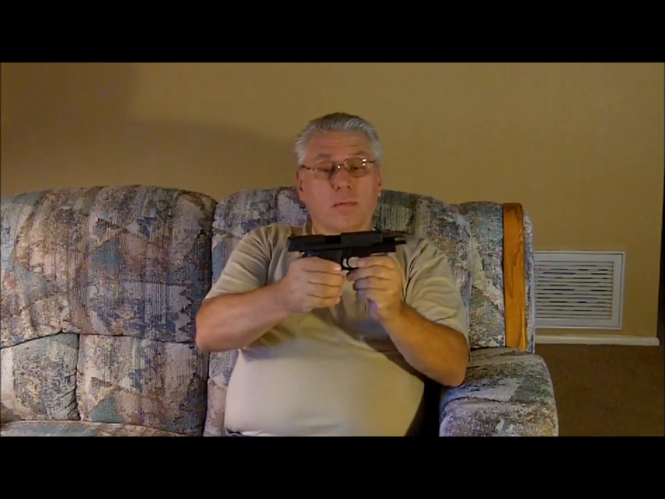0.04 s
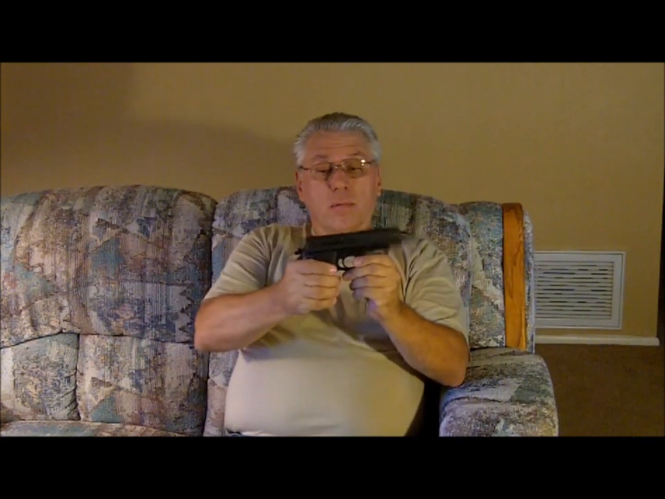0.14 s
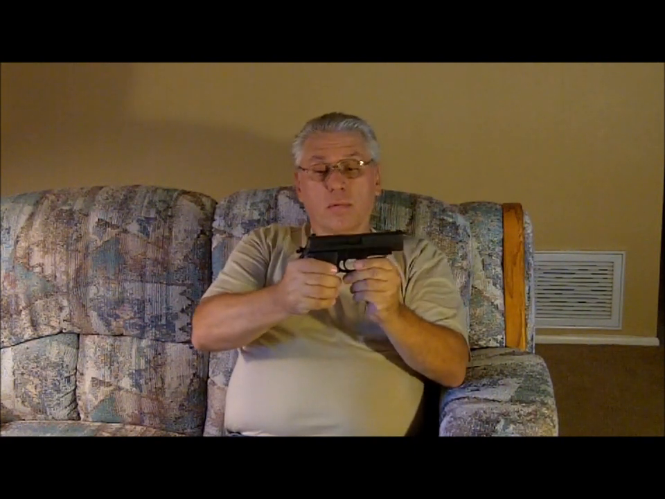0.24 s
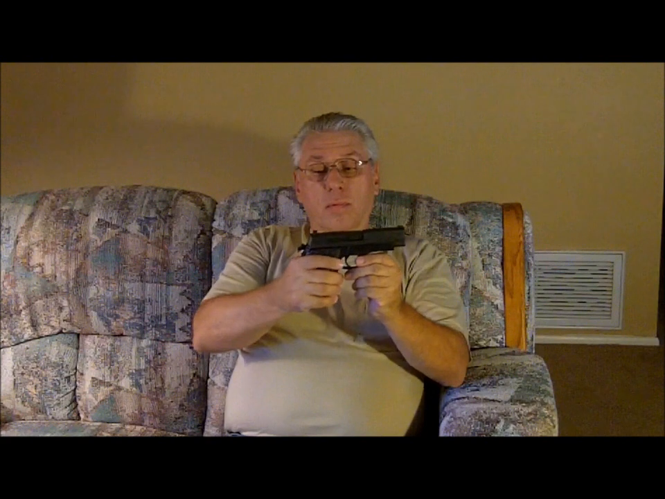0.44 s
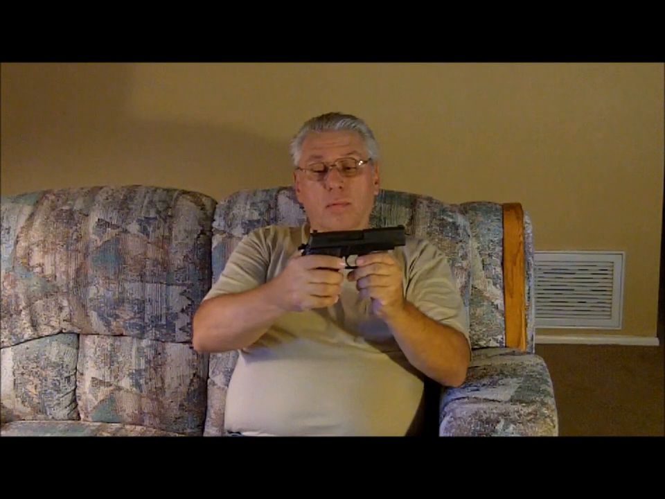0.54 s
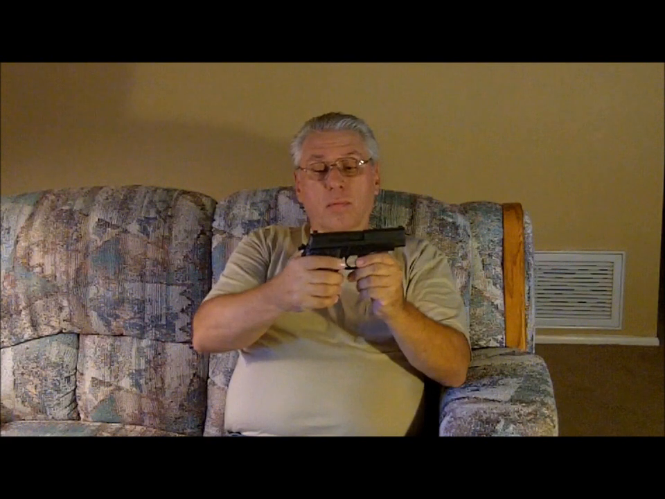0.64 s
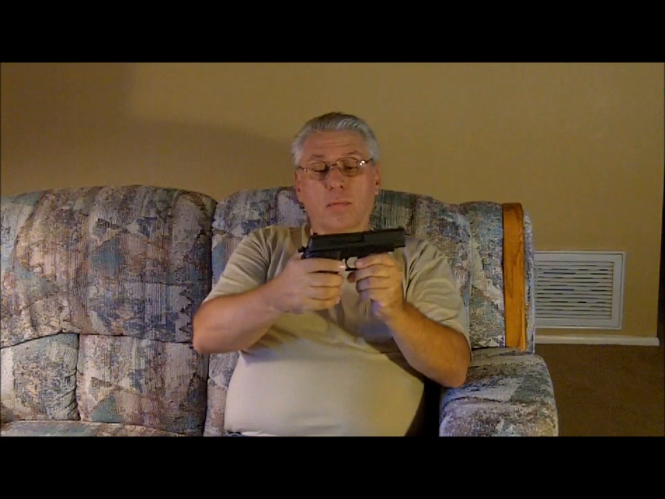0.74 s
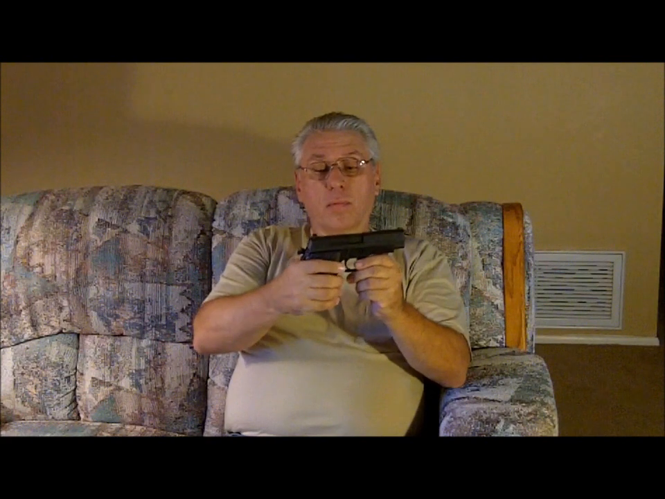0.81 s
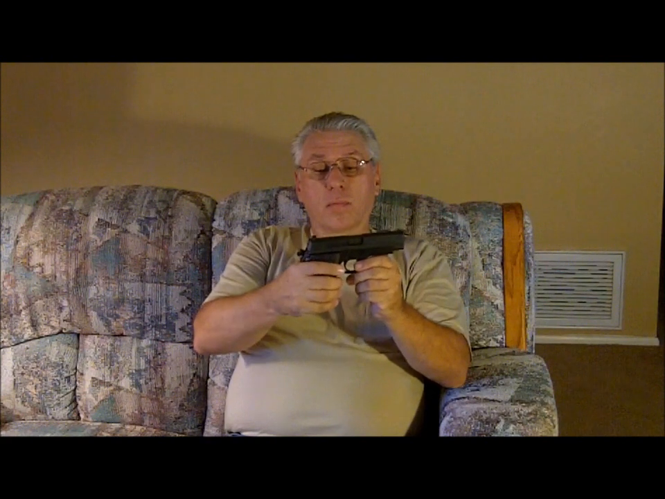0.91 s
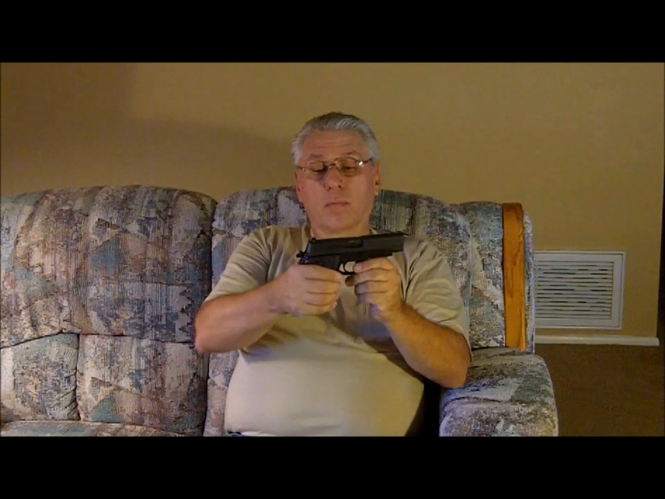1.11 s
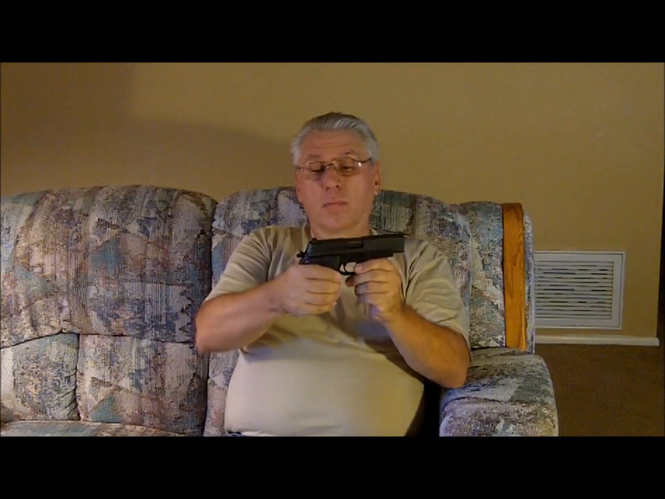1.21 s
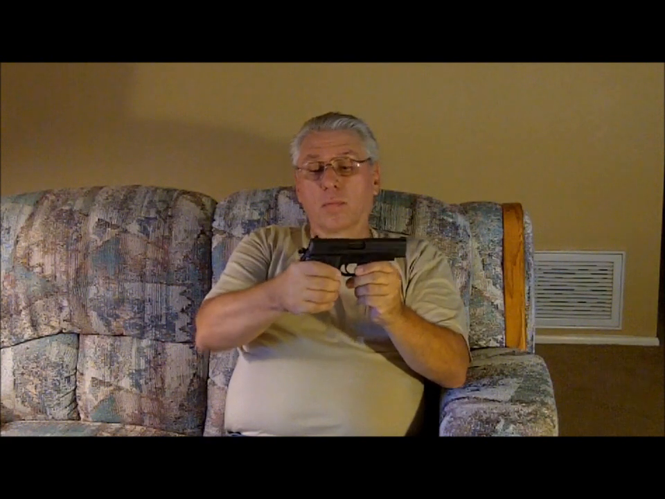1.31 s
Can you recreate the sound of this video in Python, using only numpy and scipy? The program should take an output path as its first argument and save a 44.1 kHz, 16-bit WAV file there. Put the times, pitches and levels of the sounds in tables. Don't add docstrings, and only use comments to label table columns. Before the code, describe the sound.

A pistol's steel slide snaps forward and slams shut in a living room, ringing briefly

```python
import sys
import numpy as np
from scipy import signal
from scipy.fft import rfft, irfft, next_fast_len
from scipy.io import wavfile
from scipy.ndimage import uniform_filter1d, map_coordinates

SR = 44100
rng = np.random.default_rng(int(sys.argv[2]) if len(sys.argv) > 2 else 0)


def to_wav(s):
    ch = np.atleast_2d(s).T
    pcm = np.round(np.clip(ch, -1, 1) * 32767)
    wavfile.write(sys.argv[1], SR, pcm.astype(np.int16))


def nominal_scale(level):
    x = np.asarray(level, float) / 20
    return 10 ** x


N = 59535
TIME = np.arange(N) / SR

# frequency in Hz, left-right likeness (1 is mono).
LIKENESS = [(60, 0.57), (240, 0.6), (940, 0.66), (3710, 0.61), (14700, 1)]
# frequency in Hz, level in dB per Hz.
TICK_COLOUR = [(240, -43), (400, -13.5), (702, -5.5), (2160, -10), (2760, -18), (4910, -7.5), (15100, -28)]
# frequency in Hz, level in dB per Hz.
STEEL_COLOUR = [(120, -42), (200, -9), (1000, -17), (2220, -2.5), (3560, -7), (4190, -0.5), (9620, -10.5),
                (15100, -15)]


def unit(x):
    return x / np.sqrt(np.mean(x ** 2) + 1e-20)


def along(points, hz):
    f, value = np.transpose(points)
    return np.interp(np.log(hz + 1), np.log(f + 1), value)


def closed(points, hz):
    inside = (hz >= points[0][0] / 2) * (hz <= points[-1][0] * 2)
    return nominal_scale(along(points, hz)) * inside


def filtered(x, response):
    n = x.shape[-1]
    m = next_fast_len(n + SR)
    hz = np.fft.rfftfreq(m, 1 / SR)
    return irfft(rfft(x, m) * response(hz), m)[..., :n]


def coloured(n, colour):
    return unit(filtered(rng.standard_normal(n), lambda hz: closed(colour, hz)))


def wobble(rate):
    knots = rng.standard_normal(int(N * rate / SR) + 4)
    return map_coordinates(knots, [np.arange(N) * rate / SR])


def rush(colour, likeness):
    def response(hz):
        turn = np.arccos(np.clip(along(likeness, hz), -1, 1)) / 2
        return closed(colour, hz) * [np.cos(turn), np.sin(turn)]

    mid, side = filtered(rng.standard_normal((2, N)), response)
    return unit(np.array([mid + side, mid - side]))


def swell(start_s, rise_s):
    return np.clip((TIME - start_s) / rise_s, 0, 1)


def struck(contacts, modes, colour):
    mode_scatter_db, phase_scatter_rad = 2, 0.6
    crack_t60_s, strike_s = .012, 0.00022
    out = np.zeros(N + SR)
    t = np.arange(SR // 4) / SR
    hz, level, t60 = np.transpose(modes)[:, :, None]
    for start_s, db, crack_db in contacts:
        scatter, phase = rng.standard_normal((2, len(modes), 1))
        decay = nominal_scale(level + mode_scatter_db * scatter - 60 * t / t60)
        ring = np.sum(decay * np.sin(2 * np.pi * hz * t + phase_scatter_rad * phase), axis=0)
        ring = ring / np.sqrt(np.sum(nominal_scale(level) ** 2))
        crack = coloured(len(t), colour) * nominal_scale(crack_db - 60 * t / crack_t60_s)
        onset = 1 - np.exp(-t / strike_s)
        out[round(start_s * SR):][:len(t)] += nominal_scale(db) * (ring + crack / 2) * onset
    return out[:N]


def room_tone():
    # frequency in Hz, level in dB per Hz.
    colour = [(29, -30.5), (50, -0.5), (161, -3), (205, -3.5), (330, -4), (800, -14), (1320, -17),
              (2770, -24), (15100, -35.5)]
    return nominal_scale(-43 + .8 * wobble(3) + .6 * wobble(13)) * rush(colour, LIKENESS)


def air():
    # time in seconds, strength in dB.
    gusts = [(0.0, -39), (0.036, -34.5), (0.232, -31), (0.262, -32), (0.394, -41), (0.47, -37), (0.6, -30),
             (0.784, -49.5), (0.966, -37), (1.094, -35), (1.142, -32), (1.24, -38), (1.304, -33),
             (1.35, -44)]
    # frequency in Hz, level in dB per Hz.
    colour = [(3, -10), (8, 1.5), (16, 1), (30, -11), (60, -30.5), (120, -50.5)]
    s, db = np.transpose(gusts)
    drift = rush(colour, [(10, 0.68)])
    drift = drift / np.sqrt(np.abs(uniform_filter1d(drift ** 2, size=5000)) + 0.044)
    return nominal_scale(np.interp(TIME, s, db)) * nominal_scale([[4], [-3.5]]) * drift


def thumb():
    # start in seconds, peak in dB, crack over ring in dB.
    contacts = [
        (.1105, -37, -22),
        (.1118, -34.5, -20),
    ]
    # frequency in Hz, level in dB, t60 in seconds.
    modes = [(4300, 0, .008), (4770, 1, 0.007)]
    return struck(contacts, modes, TICK_COLOUR)


def catch():
    # start in seconds, peak in dB, crack over ring in dB.
    contacts = [
        (.1344, -17, -11.5),
        (.1357, -19.5, -1.5),
        (.1366, -24.5, 4),
        (.1373, -20.5, 0.5),
        (.1432, -30, 5),
    ]
    # frequency in Hz, level in dB, t60 in seconds.
    modes = [(720, -0.5, 0.014), (1050, -4.5, 0.013), (2200, 1.5, 0.0057), (3274, -9, 0.015),
             (4910, -7.5, 0.011), (7070, -11, .012), (8520, -13, .012)]
    return struck(contacts, modes, TICK_COLOUR)


def release():
    # start in seconds, peak in dB, crack over ring in dB.
    contacts = [
        (.2431, -17, -2),
        (.2452, -3, 3),
        (.2470, -10, 5),
        (.2492, 1, -2),
        (.2530, -16.5, 3.5),
        (.2636, -13, 3.5),
    ]
    # frequency in Hz, level in dB, t60 in seconds.
    modes = [(750, -8, .022), (1130, -7.5, .016), (3380, -2, .012), (3620, 4, 0.011), (3983, -0.5, 0.018),
             (5000, -7, 0.0088), (6710, -10.5, 0.015), (8070, -9, 0.015), (12780, -9, .008)]
    return struck(contacts, modes, STEEL_COLOUR)


def scrape():
    travel = (TIME > .2435) * (TIME < .266)
    return travel * nominal_scale(-24.5 + 5 * wobble(900)) * coloured(N, STEEL_COLOUR)


def slam():
    # start in seconds, peak in dB, crack over ring in dB.
    contacts = [
        (.2657, -4, 8.1),
        (.2668, 5.5, 8),
        (.2683, 3.5, 8),
        (.2700, 6, 8.53),
        (.2745, 2, 5),
        (.2775, 3, 5),
        (.2850, -3, 5),
    ]
    # frequency in Hz, level in dB, t60 in seconds.
    modes = [(683, -13, 0.017), (1400, -8, .012), (2130, -5, .012), (2890, -11.5, .012), (4014, -2.5, .009),
             (4800, -5, 0.011), (6280, -3, .01), (7252, -9, .05), (7334, -8, .05), (7530, -8, 0.062),
             (7980, -5, .012), (12040, -7, .012), (13530, -8.5, .009), (14020, -9, .009)]
    return struck(contacts, modes, STEEL_COLOUR)


def ports(x):
    echoes, spread_s, echo_db, fade_db_per_s = 14, .022, -12, 303.5
    right_lag_s = .0018
    taps = np.zeros((2, SR // 10))
    delay_s = .001 + spread_s * rng.random((2, echoes)) ** 1.5
    when = (SR * delay_s).astype(int)
    strength = nominal_scale(echo_db - fade_db_per_s * when / SR) * rng.standard_normal((2, echoes))
    np.put_along_axis(taps, when, strength, axis=1)
    taps[:, 0] = nominal_scale([0, -5.5])
    taps[1, round(right_lag_s * SR)] = nominal_scale(-2.5)
    return signal.fftconvolve(x[None], taps, axes=1)[:, :N]


def all_round(x):
    blur_hz, centre_s = 343, .269
    power = np.abs(uniform_filter1d(np.abs(rfft(x)) ** 2, round(blur_hz * N / SR)))
    return np.roll(irfft(np.sqrt(power), N), round(centre_s * SR))


def room(x):
    # frequency in Hz, t60 in seconds.
    decay = [(150, .2), (650, 0.5), (1500, .55), (4000, 0.54), (7300, 0.44), (11000, 0.39), (15000, .33)]
    # frequency in Hz, level in dB.
    colour = [(250, -19), (700, 1), (2000, -4), (5000, 0), (7300, 4), (9000, 2.5), (15000, -3.5)]
    gap_s, likeness, right_db = .008, 0.81, 2
    hz, t, z = signal.stft(rng.standard_normal((2, SR)), SR, nperseg=256)
    fall_db = along(colour, hz)[:, None] - 60 * t / along(decay, hz)[:, None]
    mid, side = signal.istft(z * nominal_scale(fall_db), SR, nperseg=256)[1]
    turn = np.arccos(likeness) / 2
    tail = np.cos(turn) * mid + np.sin(turn) * side * np.array([[1], [-1]])
    tail = tail / np.linalg.norm(tail[0])
    late = np.pad(x, (round(gap_s * SR), 0))[None]
    return signal.fftconvolve(late, tail, axes=1)[:, :N] * nominal_scale([[0], [right_db]])


def bump():
    centre_s, width_s, pitch_hz = .875, .012, 185
    envelope = np.exp(-((TIME - centre_s) / width_s) ** 2)
    return nominal_scale(-35) * envelope * np.sin(2 * np.pi * pitch_hz * TIME)


def cushion():
    # frequency in Hz, level in dB per Hz.
    colour = [(25, -2), (45, 0.5), (90, -7), (160, -24)]
    return nominal_scale(-33.5) * swell(1.238, 0.066) * rush(colour, LIKENESS)


def sleeve():
    # frequency in Hz, level in dB per Hz.
    colour = [(600, -0.5), (2500, -3), (4500, -2.5), (5500, -3), (9000, -11.5), (14000, -24)]
    return nominal_scale(-50 + 1.5 * wobble(300)) * swell(1.295, 0.028) * rush(colour, LIKENESS)


def pin():
    # start in seconds, peak in dB, crack over ring in dB.
    contacts = [
        (1.346, -39.5, 0.0062),
    ]
    # frequency in Hz, level in dB, t60 in seconds.
    modes = [(12500, -1.5, .02), (5500, -4.5, .02)]
    return struck(contacts, modes, STEEL_COLOUR)


def scene():
    small = thumb() + catch() + release() + scrape() + pin()
    blow = slam()
    direct = ports(small + blow)
    reverb = nominal_scale(-3.5) * room(nominal_scale(-7) * small + all_round(blow))
    return direct + reverb + room_tone() + bump() + cushion() + sleeve()


def band_limit(x):
    return signal.sosfilt(signal.butter(12, 15280, fs=SR, output="sos"), x)


def record(dry):
    # time in seconds, automatic gain in dB.
    gain = [
        (.2655, 1),
        (.27, -10.5),
        (.28, -14),
        (.3, -19),
        (.4, -15.5),
        (.6, -10),
        (.75, -5.5),
        (.95, -7),
        (1.1, -2.5),
        (1.3, 0.5),
    ]
    band_hz, edge_hz = 15350, 120
    ceiling, knee = 1.0, 8
    s, db = np.transpose(gain)
    x = filtered(dry, lambda hz: (1 - np.tanh((hz - band_hz) / edge_hz / 2)) / 2)
    x = x * nominal_scale(np.interp(TIME, s, db)) + air() + .003
    mix = x / (1 + np.abs(x / ceiling) ** knee) ** (1 / knee)
    return band_limit(mix)


dry = scene()
out = record(dry)
to_wav(out)
```